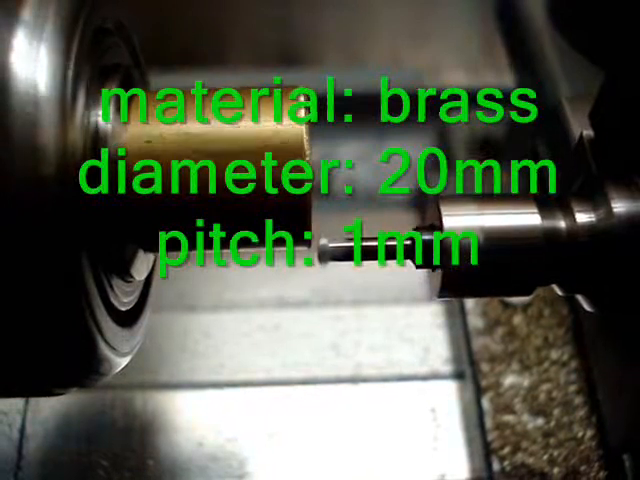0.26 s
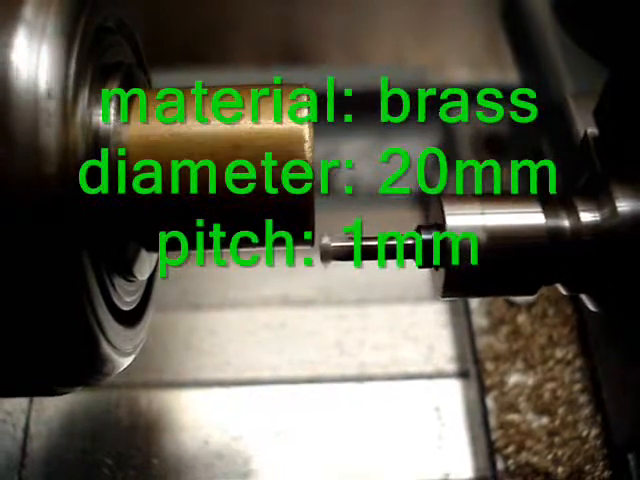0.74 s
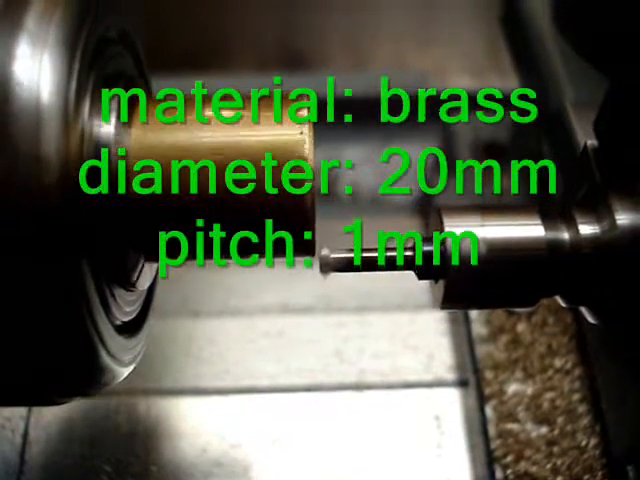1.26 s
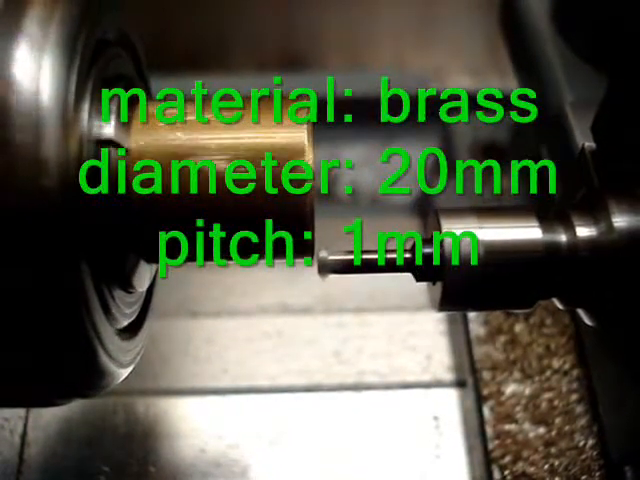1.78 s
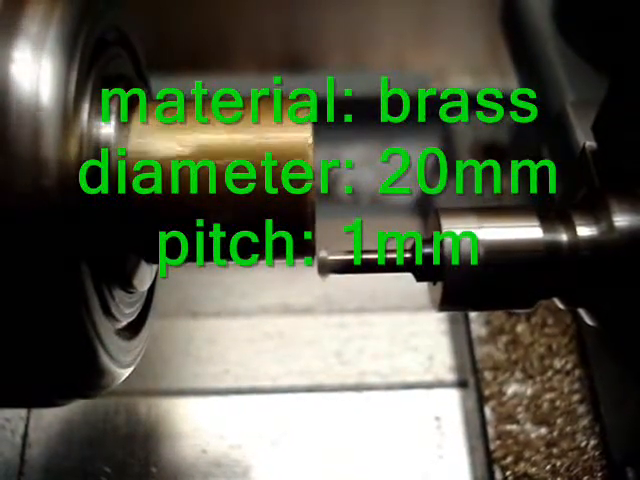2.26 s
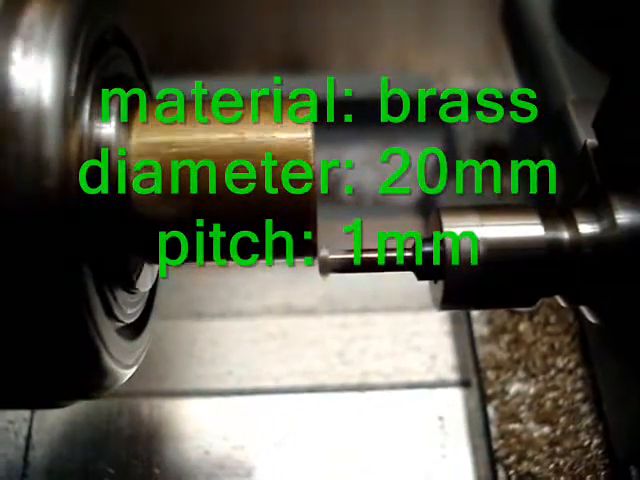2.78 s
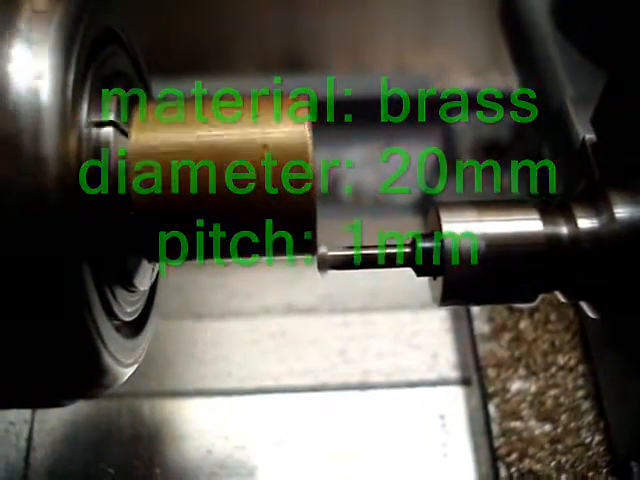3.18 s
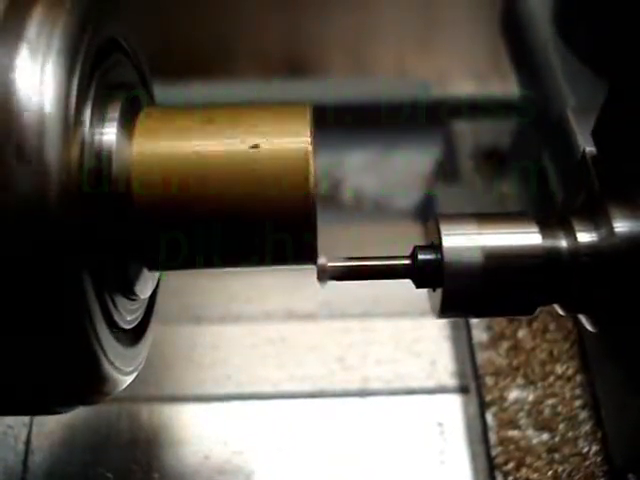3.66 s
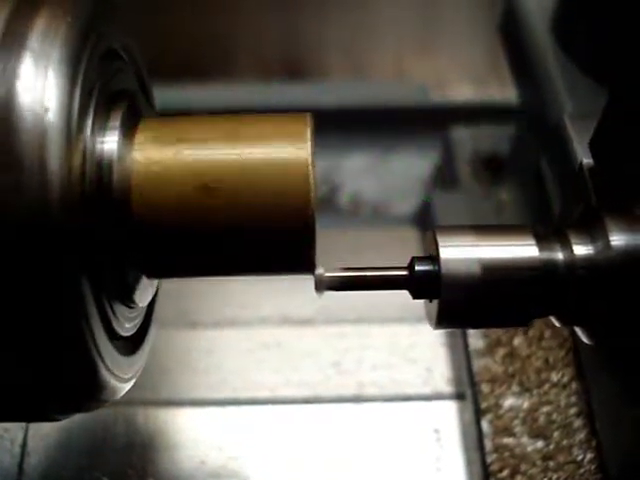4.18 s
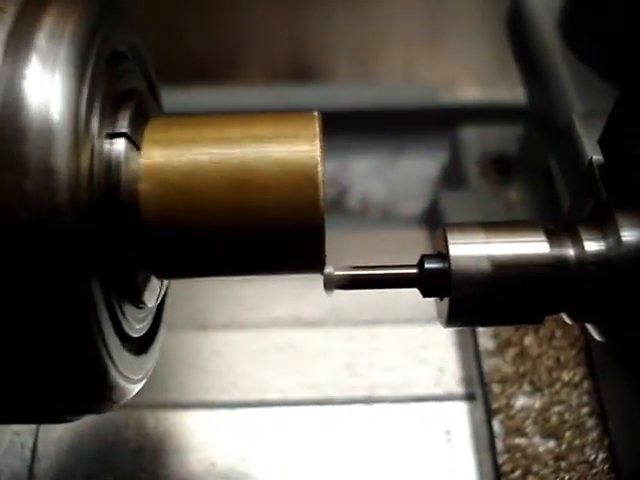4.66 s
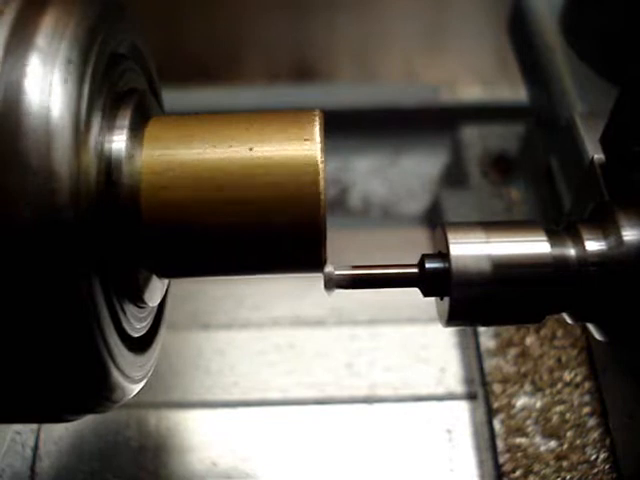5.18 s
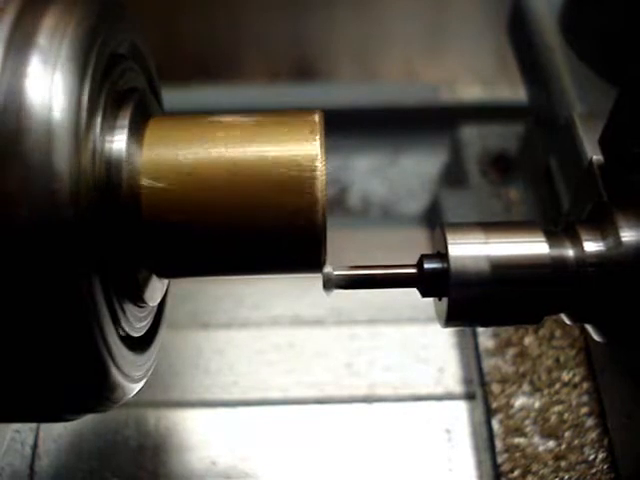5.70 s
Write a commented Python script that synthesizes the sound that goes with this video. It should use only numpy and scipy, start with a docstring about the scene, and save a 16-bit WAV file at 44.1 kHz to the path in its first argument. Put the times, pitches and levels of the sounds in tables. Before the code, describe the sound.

Close, steady whine and bearing rush of a lathe's milling spindle, ending in a loud buzzing cut into metal.

```python
"""A small lathe spindle spins close by, about 13400 turns a minute, and its shaft whines.
Its ball bearings sing and rush, and it sags a little when the slide starts to feed it toward a brass bar.
Near the end the cutter bites into the bar: one blow a turn makes a loud buzz that slows under the load,
while chips tear off and the cutter squeals once. Behind it all are a few light metal ticks
and the lathe's faint hum, low drone and dull knocks."""
import sys
import numpy as np
from scipy import signal
from scipy.fft import rfft, irfft, next_fast_len
from scipy.io import wavfile
from scipy.ndimage import map_coordinates

SR = 44100
rng = np.random.default_rng(int(sys.argv[2]) if len(sys.argv) > 2 else 0)


def output_pcm(signal):
    """Save a mono or channel-first signal as 16-bit PCM at the path in sys.argv[1].

    Samples are clipped to [-1, 1] before scaling.
    """
    pcm = np.clip(np.atleast_2d(signal).T, -1, 1) * 32767
    wavfile.write(sys.argv[1], SR, np.round(pcm).astype(np.int16))


N = 261513
TIME = np.arange(N) / SR
IDLE_HZ = 223.12  # turns a second when the spindle runs free
BITE_AT_S = 5.445  # the cutter meets the brass


def spindle_speed(feed, sag_hz=.93, brake_hz_per_s=7.05, brake_lag_s=.035):
    """Turns a second: the spindle gets up to speed, sags a while under the feed, and the cut brakes it."""
    run_up = .72 * np.exp(-TIME / .1)
    sag = sag_hz * feed * (1 - ramp(start_s=4.5, length_s=.8))  # the drive makes up the loss
    braking = brake_hz_per_s * np.maximum(TIME - BITE_AT_S - brake_lag_s, 0)
    return IDLE_HZ - run_up - sag - braking


# Shaft tones at 1, 2, 3 ... times its speed: relative level/dB running free, the same while feeding
SHAFT_TONES = [(-38.5, -39), (-40.5, -38), (-43, -40), (-46, -40.5), (-34, -45), (-44.5, -39), (-48, -34),
               (-32.5, -33), (-67, -51), (-37.5, -42), (-59, -57), (-46.5, -46.5), (-59, -47.5),
               (-48.5, -47.5), (-52, -60), (-58, -59), (-69, -68), (-61, -68), (-69, -59), (-67, -62),
               (-77, -65), (-80, -78), (-65, -65), (-51, -55)]
# Bearing tones: multiple of the shaft speed, relative level/dB running free, the same while feeding
BEARING_TONES = [(4.55, -44, -49), (4.7, -46, -49), (5.39, -41, -40), (5.65, -41, -43), (5.85, -40, -38),
                 (6.65, -40, -36), (8.65, -38, -39), (9.65, -40, -41), (9.85, -40, -39), (10.85, -52, -49),
                 (11.65, -42, -49), (12.65, -52, -57), (12.85, -50, -51), (13.65, -52, -51),
                 (14.55, -50, -49), (18.3, -61, -59), (18.9, -63, -60), (20.4, -62, -62), (29.1, -58, -64)]


def spindle_whine(turns, angles, feed, shaft_db=-.48, bearing_db=-.5, flutter_db=1.5, slip=.12):
    """The shaft gives clean tones; the bearings add tones that waver as the balls slip."""
    out = 0
    for multiple, (free, fed) in enumerate(SHAFT_TONES, 1):
        flutter = flutter_db * min(multiple / 4, 1) * wander(12)
        db = shaft_db + free + (fed - free) * feed + flutter
        out += tone(multiple * turns + angles[multiple], db)
    for multiple, free, fed in BEARING_TONES:
        cycles = multiple * turns + rng.random() + slip * wander(9)
        out += tone(cycles, bearing_db + free + (fed - free) * feed + flutter_db * wander(14))
    return out


# How the rush throbs: multiple of the shaft speed, relative depth
THROBS = [(.15, .11), (.35, .07), (1, .17), (1.65, .1), (1.85, .07), (2, .22)]
# Tone colour of the rush: f/Hz, relative level/dB
RUSH_COLOUR = [(20, -36), (90, -26.5), (200, -15.5), (370, -17.5), (540, -6), (1100, -4), (1750, 2),
               (2150, -5.5), (2900, -12.5), (3700, -21.5), (4700, -27), (5700, -26.5), (8000, -32.5),
               (12000, -45)]
# Where the housing rings or deadens the sound: f/Hz, width/Hz, boost/dB
HOUSING_RINGS = [(826, 202, 8.5), (1526, 42, 3.5), (743, 46, -9), (4230, 100, 5)]


def bearing_rush(turns, level_db=-23, throb_depth=.53, flaw_share=.15):
    """Balls roll over rough tracks: a rush in the housing that throbs as the shaft turns."""
    throb = sum(depth * np.cos(2 * np.pi * (multiple * turns + rng.random())) for multiple, depth in THROBS)
    # the two sets of balls each meet the same flaws again and again
    flaws = unit(rough_ring(1.65 * turns, ripples=42) + rough_ring(1.85 * turns, ripples=38))
    rolling = rng.standard_normal(N) + flaw_share * flaws
    rush = colour(rolling * (1 + throb_depth * throb), RUSH_COLOUR, HOUSING_RINGS)
    # the rush starts a little softer and duller, then settles
    unsettled = 1 - ramp(start_s=0, length_s=2.6)
    treble = signal.sosfiltfilt(signal.butter(2, 2000, "high", fs=SR, output="sos"), rush)
    rush += (gain(-.5 * unsettled) - 1) * treble
    return gain(level_db - .34 * unsettled) * rush


def cutting(turns, angles, force_growth_per_s=.38, contact_turns=.15):
    """The cutter bites into the brass and sinks deeper, while its force creeps up."""
    force = ramp(BITE_AT_S, length_s=.03) * (1 + force_growth_per_s * (TIME - BITE_AT_S))
    depth = ramp(start_s=5.636, length_s=.3)
    squeal = bump(at_s=5.795, width_s=.06)
    tearing = .5 + np.exp(-(turns % 1) / contact_turns)  # strongest while the tooth is in the metal
    buzz = tooth_buzz(turns, angles, depth, squeal)
    return force * (buzz + chips(tearing, depth) + cutter_rub(turns, tearing, depth, squeal))


# Tones of the cut at first touch: multiple of the shaft speed, relative level/dB
SHALLOW_CUT = [(1, -42), (2, -21), (3, -25), (4, -16.5), (5, -15), (6, 0), (7, -2.5), (8, -26), (9, -11.5),
               (10, -22), (11, -14), (12, -15), (13, -9), (14, -16), (15, -23.5), (16, -20.5), (17, -30),
               (18, -39), (19, -31), (20, -40), (21, -31.5), (22, -38), (23, -37), (24, -34), (25, -42),
               (26, -46)]
# Tones of the cut at full depth: multiple of the shaft speed, relative level/dB
DEEP_CUT = [(1, -29), (2, -11.5), (3, -30), (4, -3.5), (5, -2.5), (6, -8), (7, 2.5), (8, -25), (9, -6.5),
            (10, -16), (11, -17), (12, -17), (13, -18.5), (14, -25), (15, -29), (16, -35.5), (17, -16.5),
            (18, -42), (19, -20.5), (20, -34), (21, -29), (22, -41), (23, -29), (24, -28), (25, -25),
            (26, -31)]
# Where the cutter's stem rings: f/Hz, width/Hz, relative boost/dB
STEM_RINGS = [(4290, 160, 11), (5700, 600, 8)]


def tooth_buzz(turns, angles, depth, squeal, level_db=-14.5, chatter_db=.97, wobble=.012, ring_share=.8):
    """The tooth strikes once a turn, making a buzz whose colour shifts as it sinks in."""
    buzz, power = 0, 0
    for multiple, ((_, shallow), (_, deep)) in enumerate(zip(SHALLOW_CUT, DEEP_CUT), 1):
        # during the squeal, tones near the stem's own pitches ring out
        ring_db = ring_share * ring_boost(multiple * IDLE_HZ, STEM_RINGS) * squeal
        db = shallow + (deep - shallow) * depth + ring_db
        angle = angles[multiple] + 1 / 4  # a quarter cycle off the shaft's own shake
        buzz += tone(multiple * turns + angle + wobble * wander(50), db + chatter_db * wander(45))
        power += gain(db) ** 2
    return gain(level_db) * buzz / np.sqrt(power)


# Tone colour of tearing brass: f/Hz, relative level/dB
CHIP_COLOUR = [(60, -21), (300, -15), (800, -5.5), (1450, 1.5), (2200, -7.5), (3100, -7.5), (4400, -22),
               (5800, -21), (8000, -28), (12000, -38)]


def chips(tearing, depth, level_db=-27, deep_boost_db=3):
    """Chips tear off in pulses of noise, louder as the cut gets deeper."""
    return colour(rng.standard_normal(N) * tearing, CHIP_COLOUR) * gain(level_db + deep_boost_db * depth)


# Tone colour of steel touching metal: f/Hz, relative level/dB
STEEL_COLOUR = [(1500, -25), (3000, -7), (4100, -4), (5600, -2), (8000, -18), (12000, -32)]


def cutter_rub(turns, tearing, depth, squeal, rub_db=-43.5, squeal_db=-42, grit=.8):
    """The cutter's side drags over nearly the same patch each turn, and squeals once on the way in."""
    drag = rough_ring(turns, ripples=70) + grit * rng.standard_normal(N) * tearing
    return colour(drag, STEEL_COLOUR, STEM_RINGS) * (gain(rub_db) * depth + gain(squeal_db) * squeal)


# Light metal ticks: t/s, relative level/dB
METAL_TICKS = [(3.98, -38), (4.681, -35), (5.197, -29)]


def ticks(decay_s=.004):
    """Small touches of metal: bright bursts that die in a few milliseconds."""
    bursts = sum(gain(db) * (TIME >= at) * np.exp(-np.abs(TIME - at) / decay_s) for at, db in METAL_TICKS)
    return .5 * bursts * colour(rng.standard_normal(N), STEEL_COLOUR)


# Knocks in the machine: t/s, f/Hz, peak level/dB, width/s
BED_KNOCKS = [(0.834, 393, -26, 0.011), (5.75, 68, -35, 0.0041), (5.837, 80, -38, 0.0046),
              (5.9, 70, -37, .005)]


def knocks():
    """The machine bed gives a few dull knocks, each a very short low tone."""
    return sum(gain(db) * bump(at, width) * np.cos(2 * np.pi * hz * (TIME - at))
               for at, hz, db, width in BED_KNOCKS)


# Tones of the lathe's hum: f/Hz, level/dB
HUM_TONES = [(60, -68), (178, -61.5), (263, -55), (300, -56.5)]


def hum(waver_db=3):
    """The lathe hums faintly, wavering in pitch and loudness."""
    return sum(tone(hz * TIME + rng.random() + .12 * wander(4.4), db + waver_db * wander(2.87))
               for hz, db in HUM_TONES)


# Swells of the drone: start t/s, length/s, added level/dB
DRONE_SWELLS = [(0, 0.058, -51), (.59, .12, -56.5), (1.674, 0.071, -54.5), (1.833, 0.385, -54),
                (4.347, 0.1, -54)]


def drone(hz=102.5, fade_s=.075, rest_db=-66):
    """A low tone swells up now and then, and lingers faintly in between."""
    loudness = gain(rest_db)
    for start, length, db in DRONE_SWELLS:
        fade_at = start - fade_s / 2
        loudness += gain(db) * (ramp(fade_at, fade_s) - ramp(fade_at + length, fade_s))
    return loudness * tone(hz * TIME, 0)


def gain(db):
    """Turn decibels into a number to multiply by."""
    return 10 ** (np.asarray(db) / 20)


def unit(x):
    """Scale a sound to an average strength (rms) of 1."""
    return x / np.sqrt(np.mean(x ** 2))


def tone(cycles, db):
    """A pure tone that follows a count of cycles, at an average (rms) level of db."""
    return np.sqrt(2) * gain(db) * np.sin(2 * np.pi * cycles)


def ramp(start_s, length_s):
    """Stay at 0, then climb straight to 1 and stay there."""
    return np.clip((TIME - start_s) / length_s, 0, 1)


def bump(at_s, width_s):
    """Rise smoothly to 1 and fall again, in a bell shape."""
    return np.exp(-((TIME - at_s) / width_s) ** 2)


def wander(rate):
    """Glide between random values of size about 1, reaching rate new ones a second."""
    place = TIME * rate + rng.random()
    values = rng.standard_normal(1024)
    k, blend = place.astype(int) % 1023, place % 1
    return values[k] + (values[k + 1] - values[k]) * blend * blend * (3 - 2 * blend)


def rough_ring(turns, ripples, size=4096):
    """A rough ring, traced round and round: the same scrape on every turn."""
    heights = np.exp(2j * np.pi * rng.random(ripples)) * gain(3 * rng.standard_normal(ripples))
    surface = irfft(np.r_[0, heights], size)
    return unit(np.interp(turns % 1 * size, np.arange(size), surface))


def ring_boost(hz, rings):
    """How many decibels a ringing part adds at this pitch."""
    return sum(boost / (1 + (2 * (hz - centre) / width) ** 2) for centre, width, boost in rings)


def colour(x, curve, rings=()):
    """Shape a sound's lows and highs by a curve and any ringing pitches; its strength comes out as 1."""
    size = next_fast_len(N)
    hz = np.maximum(np.fft.rfftfreq(size, 1 / SR), 1)
    curve_hz, curve_db = np.array(curve).T
    db = np.interp(np.log(hz), np.log(curve_hz), curve_db) + ring_boost(hz, rings)
    return unit(irfft(rfft(x, size) * gain(db), size)[:N])


def scene():
    """One count of shaft turns drives the whine, the bearings and the cut; the lathe sounds behind them."""
    feed = ramp(start_s=3.44, length_s=.272)  # the slide starts toward the bar
    turns = np.cumsum(spindle_speed(feed)) / SR + .0034 * wander(10)
    angles = rng.random(len(SHALLOW_CUT) + 1)  # where in its cycle each shaft tone starts
    spindle = spindle_whine(turns, angles, feed) + bearing_rush(turns)
    return (spindle + cutting(turns, angles) + hum() + drone() + knocks() + ticks())[None]


def record(dry, hold_hz=32002, top_hz=15400):
    """Holding each sample until the next adds a sizzle around 12 kHz; then the highest treble is cut."""
    held = np.floor(np.arange(N) * hold_hz / SR) * SR / hold_hz
    stepped = map_coordinates(dry[0], [held], order=3, mode="nearest")
    return signal.sosfilt(signal.ellip(12, .1, 90, top_hz, fs=SR, output="sos"), stepped)[None]


dry = scene()
out = record(dry)
output_pcm(out)
```